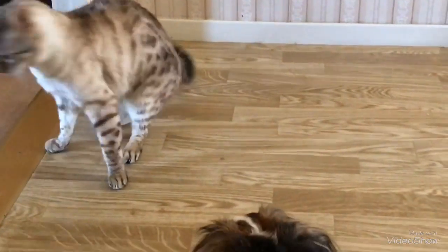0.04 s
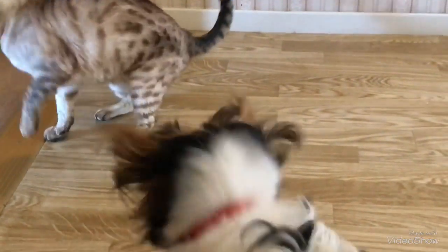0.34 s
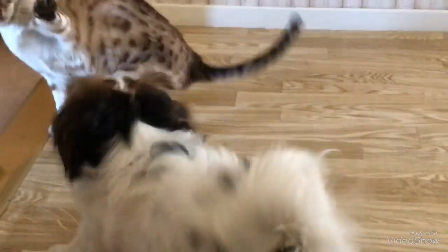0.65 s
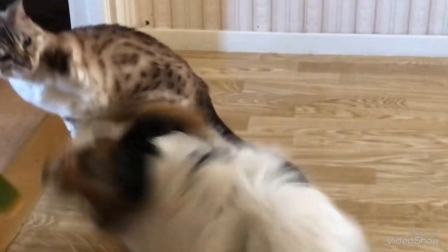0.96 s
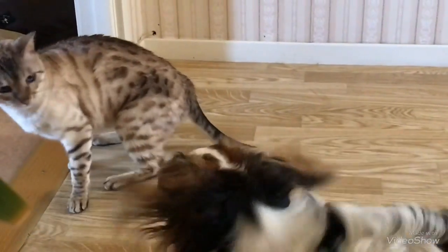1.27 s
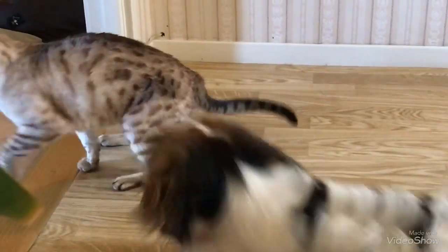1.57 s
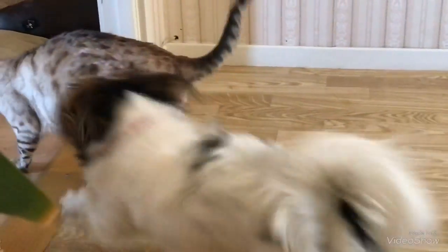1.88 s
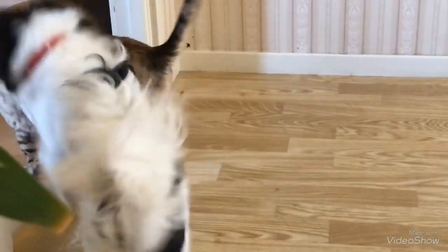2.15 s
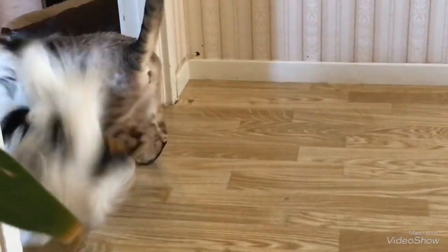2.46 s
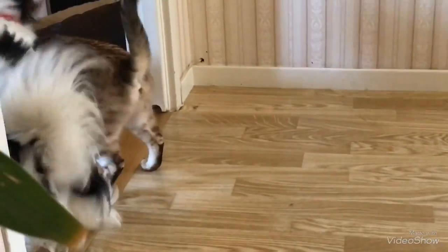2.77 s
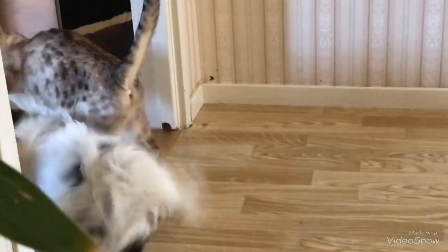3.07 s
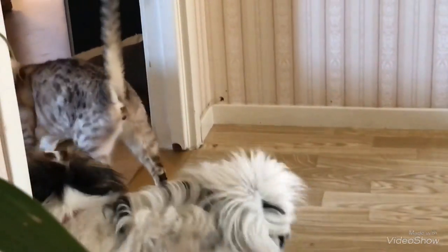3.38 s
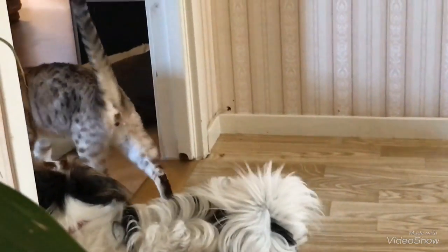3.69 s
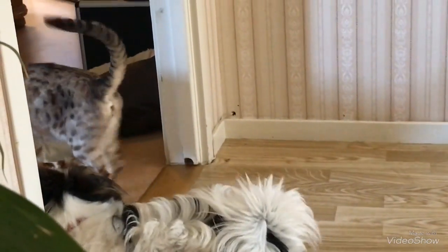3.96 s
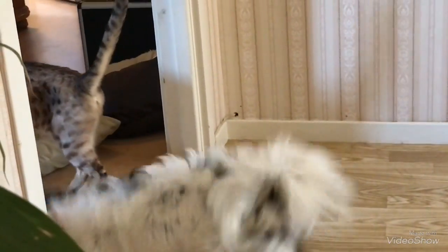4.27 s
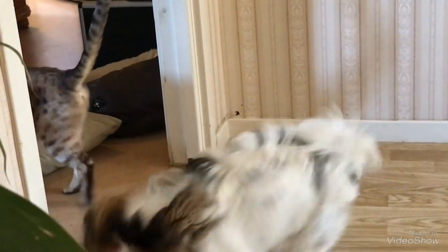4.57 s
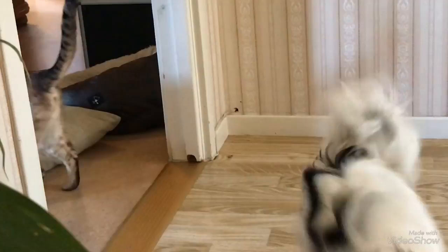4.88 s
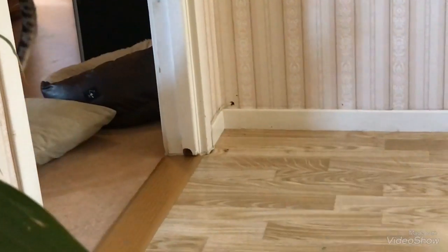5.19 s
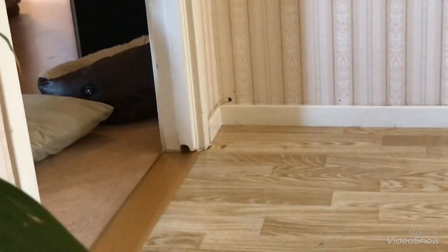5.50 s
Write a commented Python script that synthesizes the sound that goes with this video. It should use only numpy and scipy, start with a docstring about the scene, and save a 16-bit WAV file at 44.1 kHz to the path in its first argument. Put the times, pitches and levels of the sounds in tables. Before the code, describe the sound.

Sharp, irregular claw clicks and padded thuds sound close by on a hard floor as a small dog plays around a cat. The dog huffs softly as it lunges, with brief scrapes and a faint swish of fur. After one brief grunt there is a pause of about a second, then the claws clatter again and trail off. The hallway reverberates a little, and an appliance hums faintly underneath.

```python
"""A bare hallway with a laminate floor, where a small dog bounces around a cat.
Hard claws click on impact and rasp by stick-slip friction; soft pads excite the low modes of the boards.
Coats brush with a swish of friction noise. The dog huffs as it lunges, turbulent air ringing its snout,
and grunts once, pulses ringing its throat. The walls reverberate and an appliance hums faintly."""
import sys
import numpy as np
from scipy import signal
from scipy.fft import rfft, irfft, next_fast_len
from scipy.io import wavfile
from scipy.ndimage import map_coordinates

SR = 44100
rng = np.random.default_rng(int(sys.argv[2]) if len(sys.argv) > 2 else 0)


def log_audio(samples):
    """Write samples as a 16-bit WAV file to the path given in sys.argv[1]."""
    # one column per channel
    frames = np.atleast_2d(samples).T
    # limit to full scale, then quantise
    limited = np.clip(frames, -1, 1)
    pcm = np.round(limited * 32767).astype(np.int16)
    wavfile.write(sys.argv[1], SR, pcm)


N = 248679
TIME = np.arange(N) / SR

# footfalls, levels relative within a column: first touch t/s, roll from first claw to the rest t/s,
# claw level/dB, tick f/Hz, sharp edge re claw level/dB, thump level/dB, board knock level/dB
FOOTFALLS = [(.284, 0.0056, -46, 3220, -26, -41.5, -54.5), (0.4161, 0.0045, -8.5, 3120, -14, -18.5, -48.5),
             (0.5792, 0.00073, -17, 3130, -23, -38.5, -52),
             (0.7047, 0.0025, -15.5, 4670, -10.5, -24, -53.5), (.939, 0.0015, -25.5, 3040, -12.5, -59, -60),
             (1.009, 0.0044, -22.5, 4000, -12.5, -41.5, -51),
             (1.161, 0.005, -13.5, 4300, -7.5, -31.5, -50.5), (1.181, 0.00055, -19, 3930, -50, -37, -76),
             (1.7315, 0.0028, -10.5, 3270, -17, -38, -51), (1.844, 0.0031, -11, 4600, -9, -23, -50.5),
             (1.993, 0.0077, -21, 2300, -14.5, -33.5, -53.5), (2.039, 0.0032, -15.5, 3430, -20, -30, -46),
             (2.1531, 0.0031, -17.5, 2830, -17.5, -30.5, -56.5), (2.465, 0.0004, -24, 2010, -21, -43, -52),
             (2.56, 0.0045, -15.5, 5130, -10.5, -33.5, -43.5), (2.872, 0.0096, -23.5, 3970, -39, -75, -62),
             (3.013, .0005, -15, 7400, -8.5, -34, -39.5), (3.1127, 0.0031, -9, 4200, -16, -31.5, -42.5),
             (3.1854, 0.0013, -15.5, 5650, -38, -48, -51.5), (3.3027, 0.003, -17, 3660, -9, -29, -55.5),
             (4.388, 0.0036, -22, 3620, -15, -54, -64), (4.439, 0.0042, -10.5, 2750, -14.5, -38.5, -58),
             (4.537, 0.0025, -12.5, 4130, -40, -52, -56.5), (4.6931, 0.00045, -18, 3370, -11.5, -42, -53.5),
             (4.759, 0.00034, -10.5, 2250, -15.5, -36.5, -75),
             (4.796, 0.0011, -7.5, 2400, -14.5, -31, -52.5),
             (5.0, 0.0043, -17.5, 3020, -13.5, -40.5, -55.5), (5.102, 0.0026, -24.5, 3390, -21, -31.5, -55),
             (5.276, 0.0055, -21.5, 4450, -14, -42, -56), (5.322, 0.0069, -32, 2200, -12, -42.5, -58.5),
             (5.457, 0.0059, -37, 3090, -9.5, -44, -63.5), (5.579, 0.0059, -40.5, 2200, -16, -38, -60)]
# spectrum of a claw tick on laminate: f/Hz, level/dB
TICK_SPECTRUM = [(500, -28.5), (900, -13.5), (1500, -8.5), (2100, -4), (2600, -0.5), (3200, -1),
                 (4000, -1.5), (5000, -4), (6200, -1), (8000, -11), (15000, -35.5)]
# spectrum of a knocked board: f/Hz, level/dB
KNOCK_SPECTRUM = [(150, 11), (450, -0.5), (800, 5.5), (1400, -3), (2500, -41), (8000, -100)]


def amp(db):
    """Decibels to amplitude ratio."""
    return 10 ** (np.asarray(db) / 20)


def unit(x):
    """Normalisation to rms 1."""
    return x / np.sqrt(np.mean(x ** 2) + 1e-20)


def along(points, hz):
    """Interpolation of (f/Hz, value) points on a log-frequency axis."""
    f, values = np.transpose(points)
    return np.interp(np.log(hz + 1), np.log(f + 1), values)


def hump(t, middle, half):
    """A Gaussian envelope of height 1 and standard deviation half."""
    return np.exp(-.5 * ((t - middle) / half) ** 2)


def bell(hz, centre, octaves):
    """A Gaussian band of height 1 on a log-frequency axis."""
    return hump(np.log2((hz + 1) / centre), 0, octaves)


def wobble(rate):
    """Smooth random modulation, rate knots a second."""
    return map_coordinates(rng.standard_normal(int(N * rate / SR) + 4), [TIME * rate])


def ripple(hz, depth_db=2, spacing_hz=170):
    """Spectral peaks and dips in dB that differ from claw to claw and spot to spot."""
    return depth_db * map_coordinates(rng.standard_normal(len(hz)), [hz / spacing_hz])


def filtered(x, response):
    """Linear filtering: the spectrum of x times a frequency response."""
    size = next_fast_len(N + SR // 2)
    return irfft(rfft(x, size) * response(np.fft.rfftfreq(size, 1 / SR)), size)[:N]


def noise(spectrum):
    """Coloured noise of rms 1."""
    return unit(filtered(rng.standard_normal(N), lambda hz: amp(along(spectrum, hz))))


def impulse(spectrum, size=1024):
    """The minimum-phase impulse response of a spectrum, by folding its cepstrum."""
    cepstrum = irfft(np.log(amp(along(spectrum, np.fft.rfftfreq(size, 1 / SR)))))
    cepstrum[1:size // 2] *= 2
    cepstrum[size // 2 + 1:] = 0
    return irfft(np.exp(rfft(cepstrum)))


def driven(force, response):
    """Forced vibration: a force convolved with an impulse response, at rms 1."""
    return unit(signal.fftconvolve(force, response)[:len(force)])


def add(track, s, sound):
    """Superposition of a sound on the track from time s."""
    i = max(round(s * SR), 0)
    track[i:i + len(sound)] += sound[:N - i]


def room_tone(air_db=-60, waver_db=1):
    """Ambient noise: the line spectrum of a humming appliance over the continuous one of still air."""
    # hum partials: f/Hz, rms level/dB
    partials = [(49.5, -60), (120, -66.5)]
    # spectrum of the air: f/Hz, relative level/dB
    air_spectrum = [(25, -25), (42, -9.5), (56, -4.5), (87, -38), (102, -4), (123, -7), (166, -19.5),
                    (263, -25.5), (293, -19), (317, -24.5), (734, -33), (3520, -39.5), (16000, -50)]
    hum = sum(amp(db + waver_db * wobble(2.94)) * np.sqrt(2) * np.sin(2 * np.pi * hz * TIME)
              for hz, db in partials)
    return hum + amp(air_db) * noise(air_spectrum)


def hallway(x, gap_s=0.00059, build_s=0.0067, positions=4):
    """Reverberation: wall reflections decay exponentially, in a pattern that shifts as the animals move."""
    # reverberation time: f/Hz, t60/s
    decay_times = [(100, 0.94), (300, 0.23), (800, 0.53), (2500, 0.49), (6000, 0.4), (14000, 0.39)]
    out = np.zeros(N)
    for k in range(positions):
        hz, t, bands = signal.stft(rng.standard_normal(SR * 2 // 3), SR, nperseg=256)
        decay = amp(-60 * t / along(decay_times, hz)[:, None])
        tail = signal.istft(bands * decay, SR, nperseg=256)[1]
        tail *= 1 - np.exp(-np.maximum(TIME[:len(tail)] - gap_s, 0) / build_s)
        tail /= np.linalg.norm(tail)
        share = 1 - np.abs(TIME / TIME[-1] * (positions - 1) - k)  # equal-power crossfade
        here = share > 0
        add(out, TIME[here][0], signal.fftconvolve(x[here] * np.sqrt(share[here]), tail))
    return out


def rustle(fur_db=-3, flutter_db=3, half_s=0.05, swing_db=-42, lead_s=0.0027, swing_top_hz=7000):
    """Friction noise: coats brush in short strokes, and fur swishes more dully as each leg swings down."""
    # coats brushing: middle t/s, relative level/dB
    brushes = [(.255, -57), (0.31, -53), (.69, -53.5), (1.724, -46.5), (1.97, -53), (2.39, -55),
               (2.64, -51.5), (4.322, -55), (5.02, -51.5), (5.4, -59.5), (5.62, -60)]
    # spectrum of rubbed fur: f/Hz, level/dB
    fur_spectrum = [(700, -4), (1800, -4), (3300, 2.5), (6000, -2.5), (9000, -7.5), (10500, -12),
                    (13000, -7.5), (16000, -12.5)]
    strokes = sum(amp(db) * hump(TIME, s, half_s) for s, db in brushes)
    swings = sum(amp(db + swing_db) * hump(TIME, s - lead_s, half_s) for s, _, db, *_ in FOOTFALLS)
    swish = filtered(noise(fur_spectrum), lambda hz: 1 / np.hypot(1, hz / swing_top_hz))
    return amp(fur_db + flutter_db * wobble(50)) * (strokes * noise(fur_spectrum) + swings * swish)


def huffs(nose_width_hz=170, snout_width_hz=150, mouth_width_hz=360, leak_db=-14, flutter_db=3,
          low_hz=550, high_hz=4600, glide_per_s=0.511, half_s=0.027):
    """Cavity resonance: the dog's turbulent breath rings nose, snout and mouth in narrow, gliding bands."""
    # huffs: middle t/s, level/dB, nose f/Hz, nose re mouth level/dB,
    # snout f/Hz, snout re mouth level/dB, mouth f/Hz
    breaths = [(0.384, -50.5, 1110, 6, 1440, 8, 3000), (.485, -51, 785, 12, 1390, -17, 3300),
               (0.712, -46.5, 870, 4, 1450, -3, 3220), (1.128, -50, 824, 7, 1236, 6, 2250),
               (1.691, -46.5, 840, 1, 1500, -3, 2820), (1.985, -47, 890, 4, 1250, -18, 2700),
               (2.535, -46.5, 810, 6, 1100, 4, 2980), (3.068, -38.5, 810, 0.5, 1480, 1, 1970),
               (3.16, -47.5, 905, 7, 1420, -3, 1970), (4.301, -54, 864, 7.5, 1350, -6, 2500),
               (4.413, -48.5, 800, -10, 1340, 12, 3300), (4.57, -49, 704, 7, 1130, -1, 3630),
               (5.055, -46, 860, 4.5, 1240, -1, 2880), (5.371, -49.5, 840, 10, 1370, 5, 2410),
               (5.625, -52, 900, 8.5, 1430, -5, 2400)]
    out, t = np.zeros(N), np.arange(-SR // 6, SR // 6) / SR
    f = np.fft.rfftfreq(len(t), 1 / SR)
    jet = f ** 2 / (f ** 2 + low_hz ** 2) / (1 + (f / high_hz) ** 4)
    air = amp(flutter_db * wobble(120)) * rng.standard_normal(N)
    for s, db, nose, nose_db, snout, snout_db, mouth in breaths:
        cavities = [(nose, nose_width_hz, nose_db), (snout, snout_width_hz, snout_db),
                    (mouth, mouth_width_hz, 0)]
        tract = sum(amp(peak) / (1 + (2 * (f - hz) / width) ** 2) for hz, width, peak in cavities)
        puff = np.roll(air, -round(s * SR))[:len(t)]
        blown = irfft(rfft(puff) * jet * (tract + amp(leak_db)), len(t))
        warped_time = t + glide_per_s * rng.standard_normal() * t ** 2
        gliding = map_coordinates(blown, [(warped_time - t[0]) * SR])
        add(out, s + t[0], amp(db) * hump(t, 0, half_s) * unit(gliding))
    return out


def throat(pulses, top_hz):
    """Formant filtering: throat resonances of alternating sign, low-passed by the mouth."""
    # formants: f/Hz, bandwidth/Hz, level/dB
    formants = [(213, 170, 15), (328, 74, 8), (450, 47, -7), (610, 18, 11.5), (730, 75, -5)]

    def response(f):
        modes = sum((-1) ** k * amp(db) * 1j * f * width / (hz * hz - f * f + 1j * f * width)
                    for k, (hz, width, db) in enumerate(formants))
        return modes / (1 + (f / top_hz) ** 4)
    return filtered(pulses, response)


def grunt(closed_hz=370, open_hz=900, mouth_opens_s=3.361, jitter=0.06):
    """Source and filter: throat pulses, muffled until the mouth opens, drop in pitch and trail off."""
    # course of the grunt: t/s, pitch f/Hz, level/dB
    contour = [(3.279, 124.8, -56), (3.3, 110.5, -38.5), (3.355, 141.2, -48), (3.371, 152.4, -36),
               (3.398, 110.4, -39), (3.432, 116.4, -44.5), (3.465, 108, -66)]
    times, pitches, levels = np.transpose(contour)
    pitch = np.interp(TIME, times, pitches) * np.exp(jitter * wobble(130))
    pulses = np.diff(np.floor(np.cumsum(pitch) / SR), prepend=0)
    voiced = (TIME > times[0]) & (TIME < times[-1])
    force = pulses * voiced * amp(np.interp(TIME, times, levels) + wobble(130))
    opened = TIME > mouth_opens_s
    voice = throat(force * ~opened, closed_hz) + throat(force * opened, open_hz)
    return voice / np.std(throat(pulses, open_hz))


def paws(lag_s=0.00396, rise_s=0.0057, boom_db=0.5, scatter_db=1, detuning=0.02, slap_db=1, slap_t60=0.15,
         usual_db=-44, lightest_db=-10, middle_hz=135, upper_db=1, upper_per_db=0.68,
         near_s=5.25, near_half_s=0.7, near_db=9, deep_hz=80):
    """Modal vibration: a soft pad slaps the floor, which booms; light landings favour the upper modes."""
    # floor modes: f/Hz, relative level/dB, t60/s
    floor_modes = [(59.6, -12.5, 0.1), (80.3, -16.5, 0.35), (98, -20, 0.34), (119.8, 1.5, 0.15),
                   (142.5, -13.5, 0.27), (176.7, -4, 0.082), (216.6, -12, 0.2), (248.3, -15, 0.2),
                   (324, -30, 0.44)]
    # spectrum of a pad's slap: f/Hz, level/dB
    slap_spectrum = [(60, -13), (180, 0), (245, 6), (330, 3.5), (480, -8), (700, -14.5), (1500, -24),
                     (5000, -71)]
    out, t = np.zeros(N), np.arange(SR // 3) / SR
    hz, db, t60 = np.transpose(floor_modes)[:, :, None]
    press, fade = 1 - np.exp(-(t / rise_s) ** 2), amp(-60 * t / t60)
    pad = impulse(slap_spectrum)
    upper_share = np.clip(2 * np.log2(hz / middle_hz), 0, 1)
    for s, *_, thump_db, knock_db in FOOTFALLS:
        scatter, detune = rng.standard_normal((2, len(floor_modes), 1))
        tilt_db = (upper_db - upper_per_db * max(thump_db - usual_db, lightest_db)) * upper_share
        # the dog runs off close by, over the slackest boards
        deep_db = near_db * hump(s, near_s, near_half_s) * bell(hz, deep_hz, octaves=0.35)
        spot_hz = hz * (1 + detuning * detune)
        weights = amp(db + scatter_db * scatter + tilt_db + deep_db)
        boom = press * np.sum(weights * fade * np.sin(2 * np.pi * spot_hz * t), axis=0)
        boom *= amp(thump_db + boom_db) / np.abs(boom).max()
        slap = press * driven(rng.standard_normal(len(t)), pad)
        slap *= amp(min(knock_db + slap_db, thump_db) - 60 * t / slap_t60)
        add(out, s + lag_s, boom + slap)  # the pad lands after the first claw
    return out


def skids(width_octaves=0.84, grain_db=3, skirt=0.069, board_db=-19):
    """Stick-slip friction: a sliding claw rasps in one broad band and shakes the board."""
    # claw slides: middle t/s, half length t/s, level/dB, centre f/Hz
    slides = [(0.373, 0.01, -44, 3240), (2.486, 0.0085, -39.5, 4400), (2.901, 0.01, -31.5, 3130),
              (3.135, 0.068, -49, 5770), (4.574, 0.016, -41, 4200), (4.735, 0.0036, -39, 2580),
              (4.941, 0.0087, -41, 2920), (5.124, 0.018, -47.5, 4200)]
    out, t = np.zeros(N), np.arange(-SR // 4, SR // 4) / SR
    hz = np.fft.rfftfreq(len(t), 1 / SR)
    body = skirt + amp(board_db + along(KNOCK_SPECTRUM, hz))
    grit = amp(grain_db * wobble(700)) * rng.standard_normal(N)
    for s, half, db, centre in slides:
        slips = np.roll(grit, -round(s * SR))[:len(t)]
        colour = (bell(hz, centre, width_octaves) + body) * amp(ripple(hz))
        rasp = unit(irfft(rfft(slips) * colour, len(t)))
        add(out, s + t[0], amp(db) * hump(t, 0, half) * rasp)
    return out


def taps(t60=0.012, level_db=-22.0):
    """Damped impact: one claw ticks on the laminate with no weight behind it."""
    # single claw contacts: t/s, relative level/dB
    contacts = [(.201, -44), (0.716, -22.5), (1.575, -46), (1.7446, -28), (1.857, -17.5), (2.0515, -32),
                (2.712, -34), (3.125, -29), (3.3095, -19.5), (3.874, -49.5), (4.412, -31.5), (4.428, -31),
                (4.453, -19), (4.553, -24.5)]
    out, t = np.zeros(N), np.arange(SR // 20) / SR
    hz = np.fft.rfftfreq(len(t), 1 / SR)
    for s, db in contacts:
        tick = impulse(np.transpose([hz, along(TICK_SPECTRUM, hz) + ripple(hz)]))
        force = amp(-60 * t / t60) * rng.standard_normal(len(t))
        add(out, s, amp(db + level_db) * driven(force, tick))
    return out


def claws(graze_db=-8, graze_t60=0.089, crack_db=4, crack_t60=0.0012, snap_t60=0.0035, strike_db=10,
          scratch_db=-5.5, scratch_t60=0.061, scratch_rise_s=0.0011, scratch_edge_db=-3, grain_db=7,
          tick_db=-24.0, focus_db=5, edge_db=-19):
    """Hard impact and friction: the first claw grazes the laminate, the rest snap down and scratch on."""
    # spectrum of a claw's sharp edge: f/Hz, level/dB
    edge_spectrum = [(3000, -6), (6500, 12.5), (8500, 10), (10500, 2.5), (12000, 4.5), (16000, -5)]
    out, t = np.zeros(N), np.arange(SR // 20) / SR
    hz, millisecond = np.fft.rfftfreq(len(t), 1 / SR), (t * 1000).astype(int)
    knock, edge = impulse(KNOCK_SPECTRUM), impulse(edge_spectrum)
    for s, roll, db, pitch, sharp_db, _, knock_db in FOOTFALLS:
        landed, after = t >= roll, np.maximum(t - roll, 0)
        catches = unit(amp(grain_db * np.clip(rng.standard_normal(len(t)), -2, 2)[millisecond]))
        scratch = amp(scratch_db - 60 * after / scratch_t60) * catches
        scratch *= 1 - np.exp(-after / scratch_rise_s)
        graze = amp(graze_db - 60 * t / graze_t60)
        snap = landed * amp(-60 * after / snap_t60)
        grit = rng.standard_normal(len(t))
        # the hard tips land as single clicks, the first one lighter
        strikes = amp(strike_db) * ((t == 0) / 2 + np.diff(landed, prepend=False))
        contact = graze + snap + scratch
        tips = amp(crack_db - 60 * t / crack_t60) + graze + snap + amp(scratch_edge_db) * scratch
        # every step rings at its own pitch
        colour_db = along(TICK_SPECTRUM, hz) + focus_db * bell(hz, pitch, octaves=0.6) + ripple(hz)
        tick = impulse(np.transpose([hz, colour_db]))
        add(out, s, amp(db + tick_db) * driven(contact * grit + strikes, tick))
        add(out, s, amp(db + sharp_db + edge_db) * driven(tips * grit + strikes, edge))
        add(out, s, amp(knock_db) * driven(contact * grit + strikes, knock))
    return out


def scene(claw_wet_db=-5.5, soft_wet_db=-3, low_wet_db=-8, walls=3, scatter_hz=200):
    """Superposition of the scuffle's direct sound, its reverberant field and the quiet room."""
    soft, low = skids() + huffs() + rustle(), paws() + grunt()
    # a claw sends a different clatter towards each wall
    clatter = sum(hallway(claws() + taps()) for _ in range(walls)) / np.sqrt(walls)
    # the deep boom already rings in the floor; only the upper part scatters
    upper = filtered(low, lambda hz: 1 - 1 / (1 + (hz / scatter_hz) ** 6))
    echo = amp(claw_wet_db) * clatter + hallway(amp(soft_wet_db) * soft + amp(low_wet_db) * upper)
    return (claws() + taps() + soft + low + echo + room_tone())[None]


def record(dry, low_cut_hz=38, top_hz=16000):
    """Band limiting: the deepest bass rolls off and the highest treble is cut."""
    return filtered(dry[0], lambda hz: (hz < top_hz) * (1 - 1 / (1 + (hz / low_cut_hz) ** 6)))[None]


dry = scene()
out = record(dry)
log_audio(out)
```